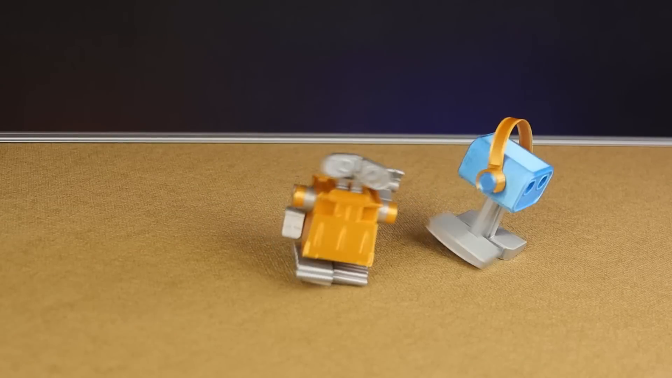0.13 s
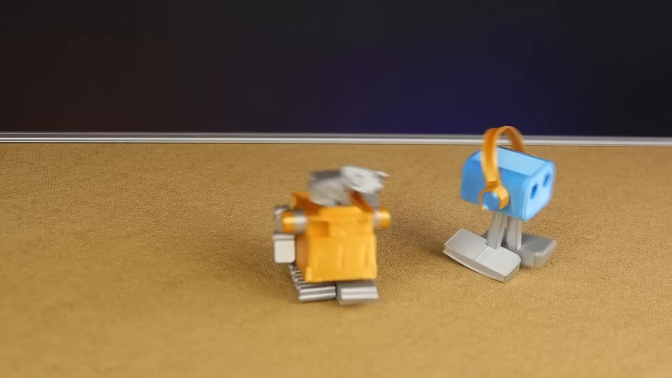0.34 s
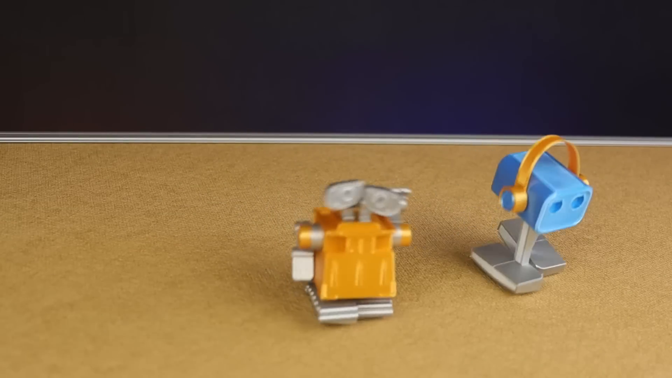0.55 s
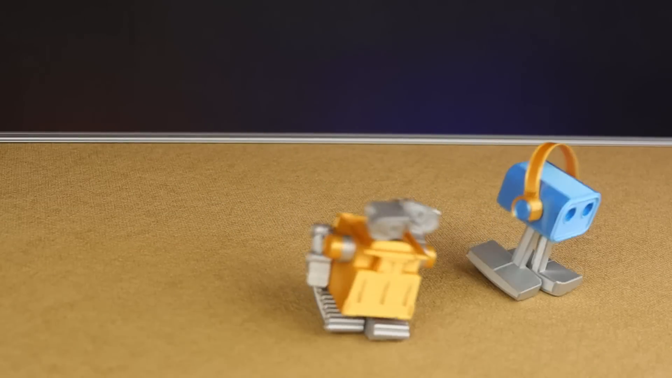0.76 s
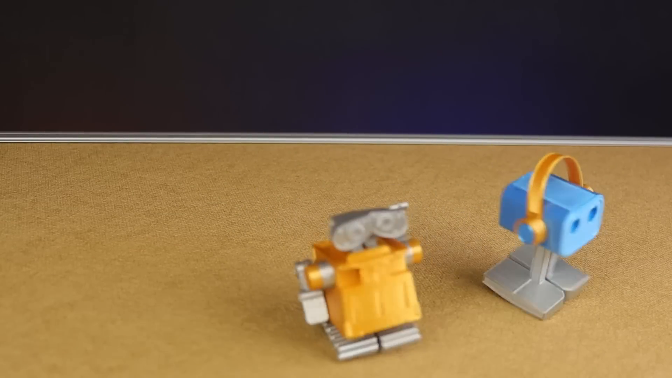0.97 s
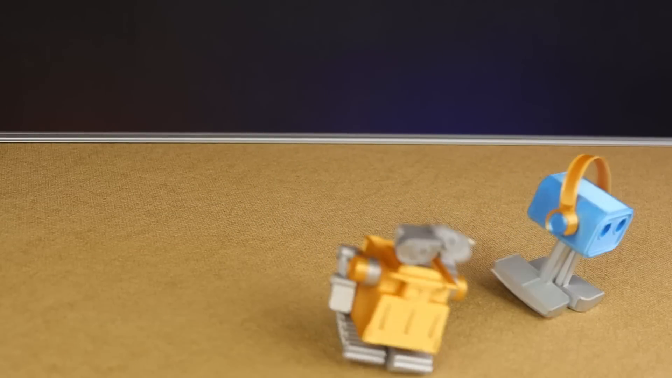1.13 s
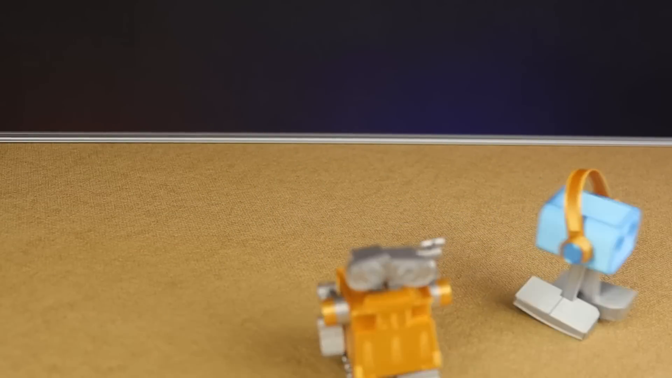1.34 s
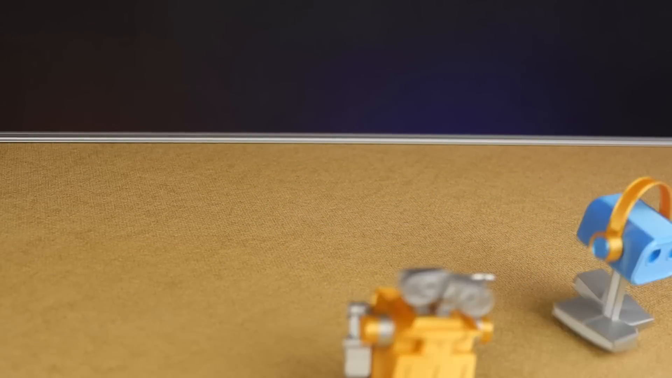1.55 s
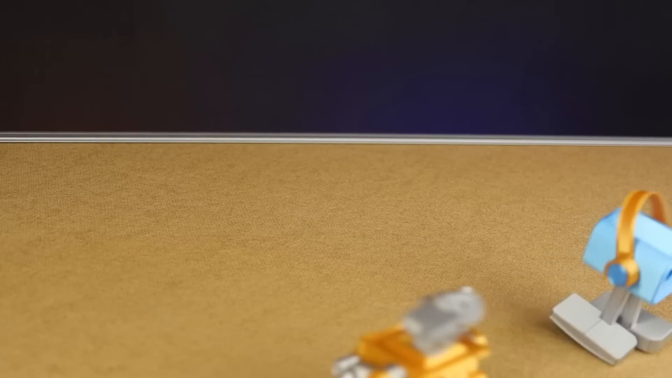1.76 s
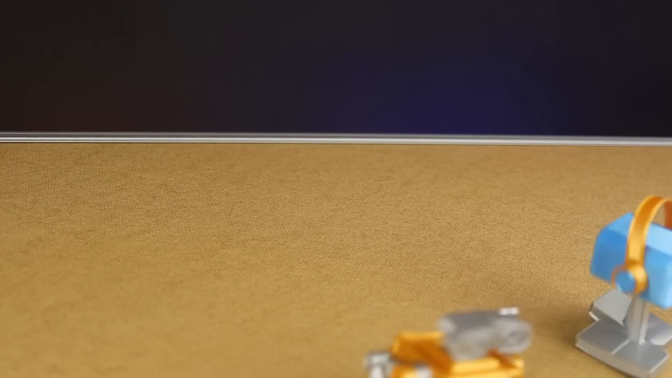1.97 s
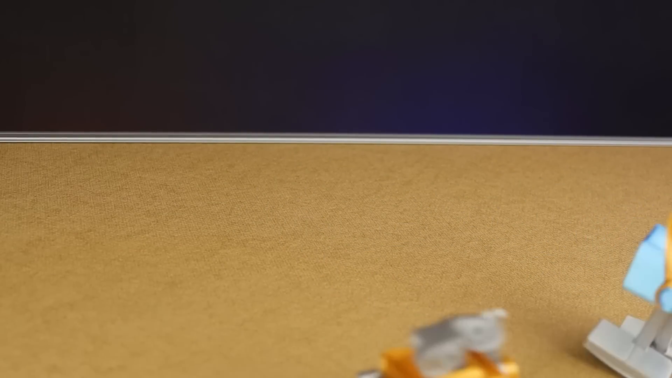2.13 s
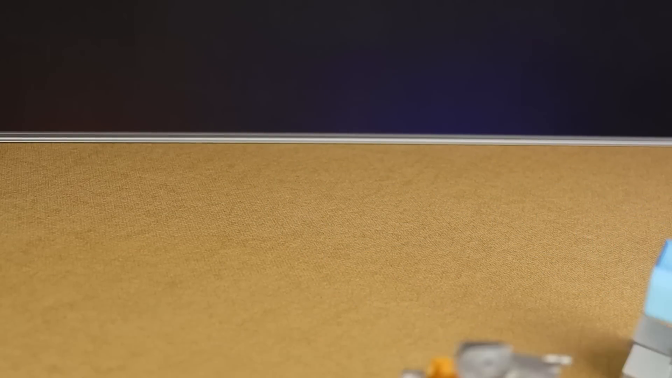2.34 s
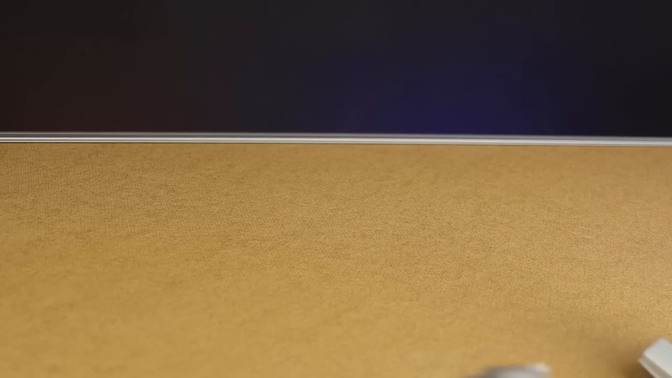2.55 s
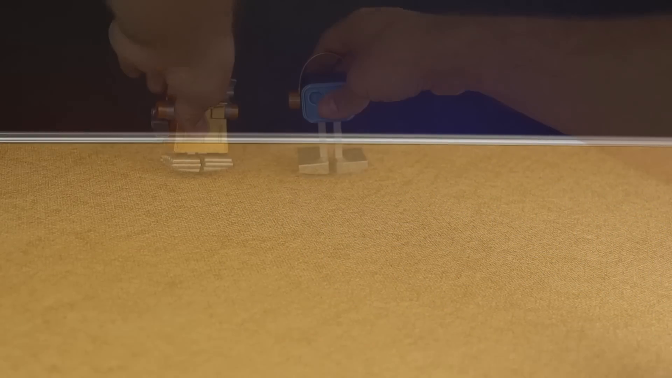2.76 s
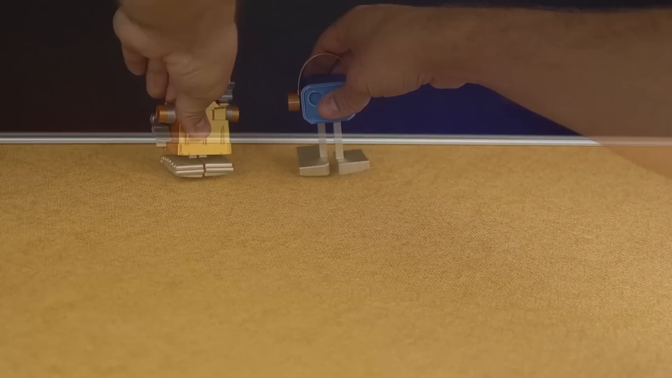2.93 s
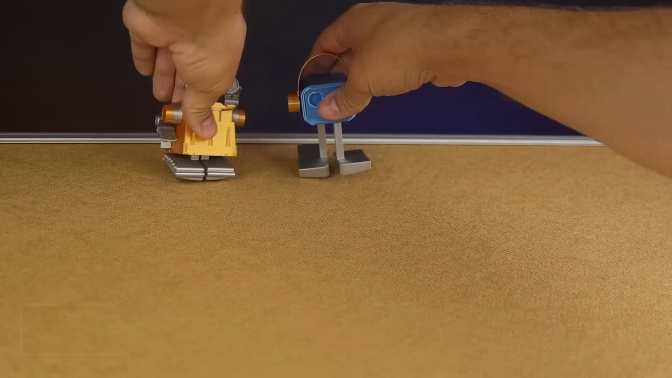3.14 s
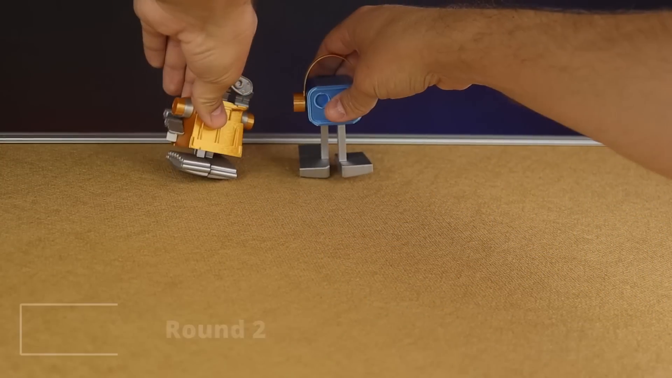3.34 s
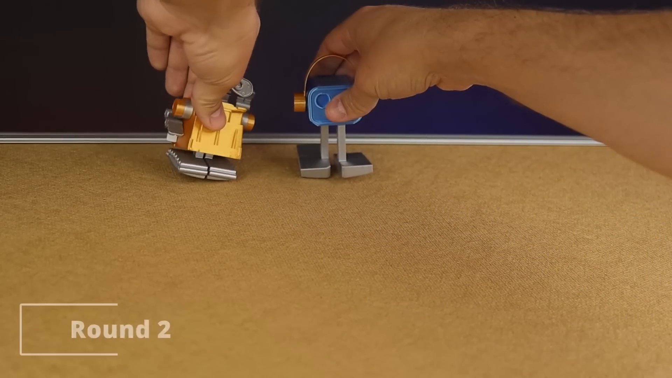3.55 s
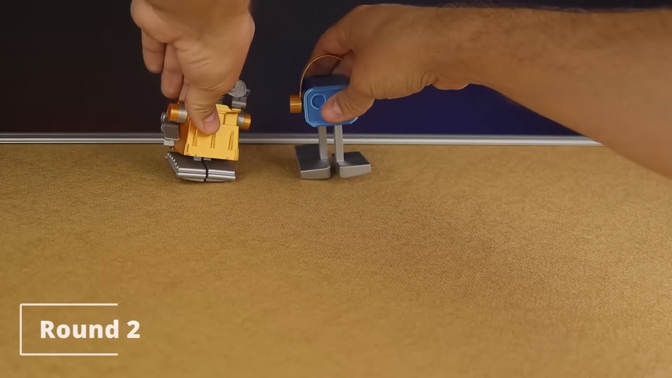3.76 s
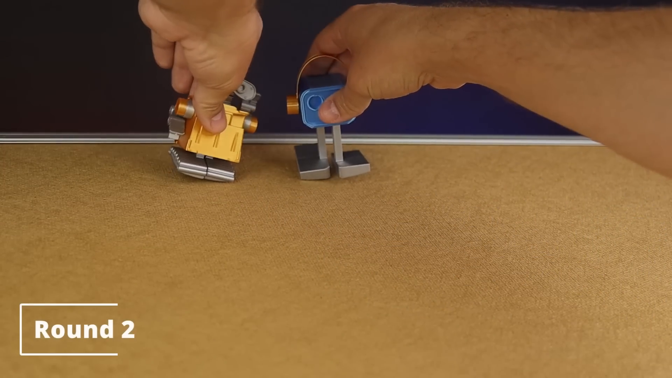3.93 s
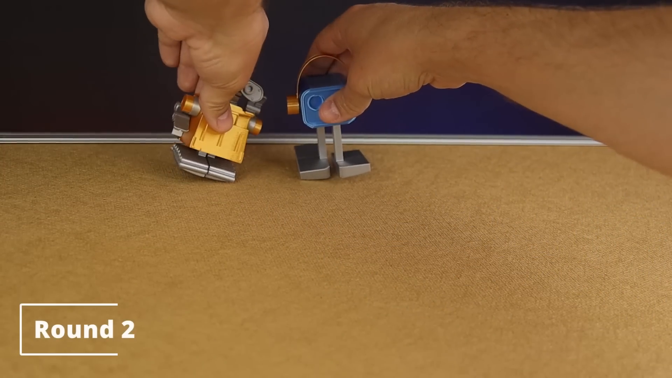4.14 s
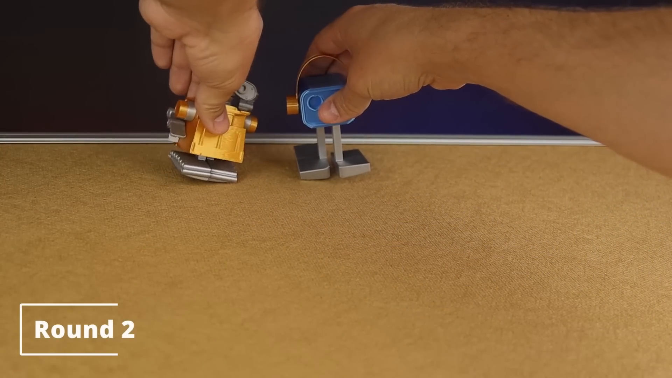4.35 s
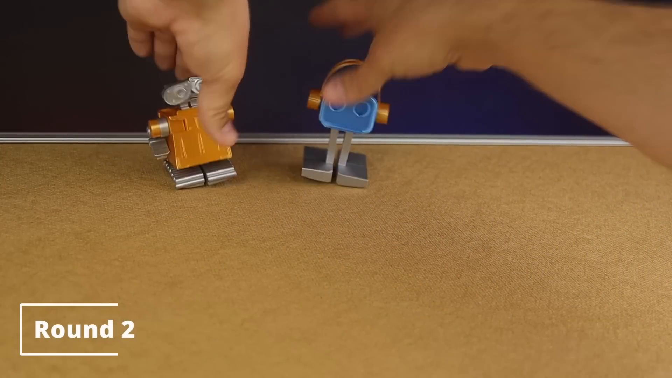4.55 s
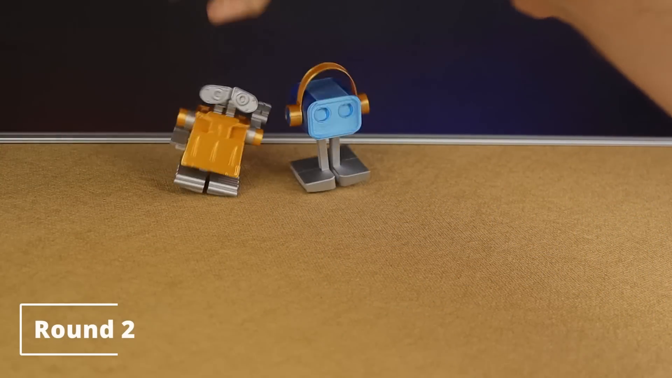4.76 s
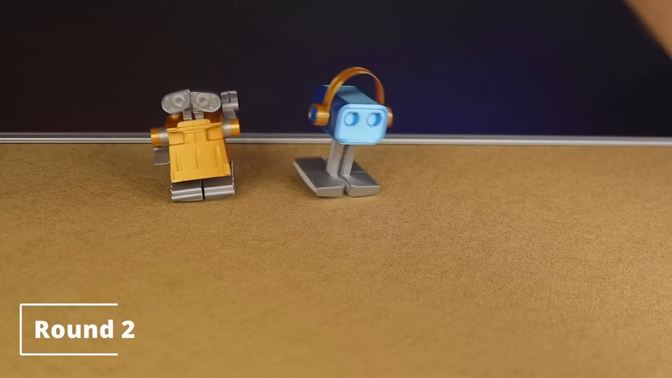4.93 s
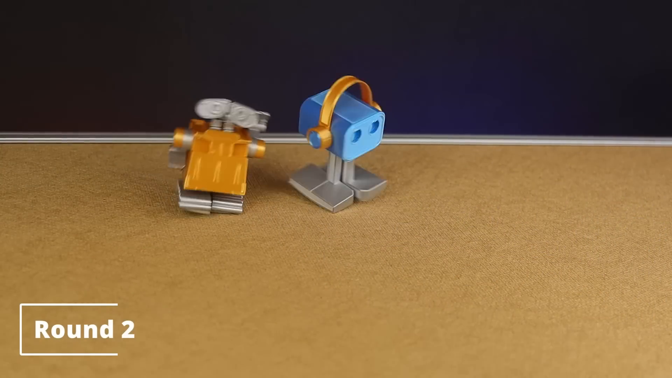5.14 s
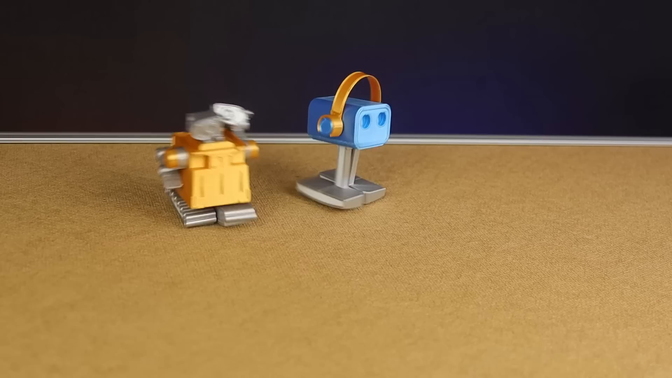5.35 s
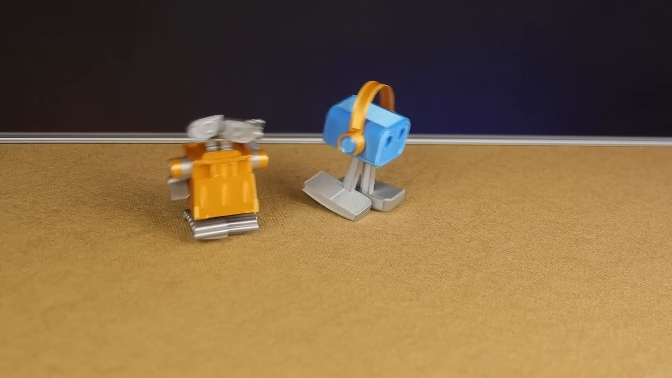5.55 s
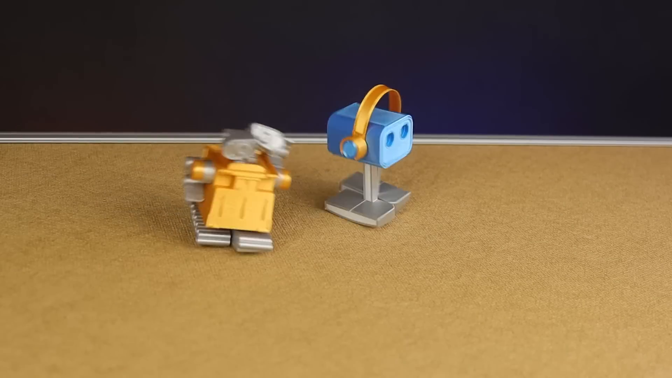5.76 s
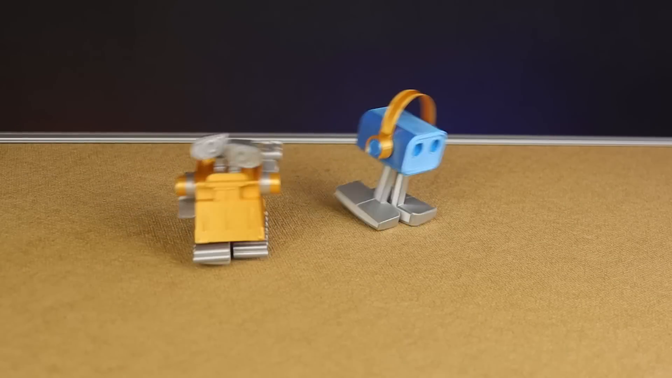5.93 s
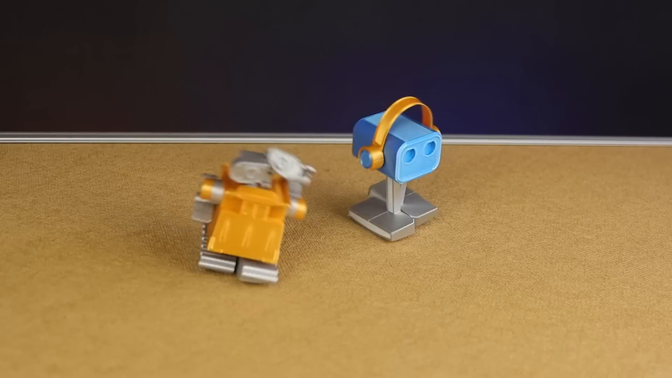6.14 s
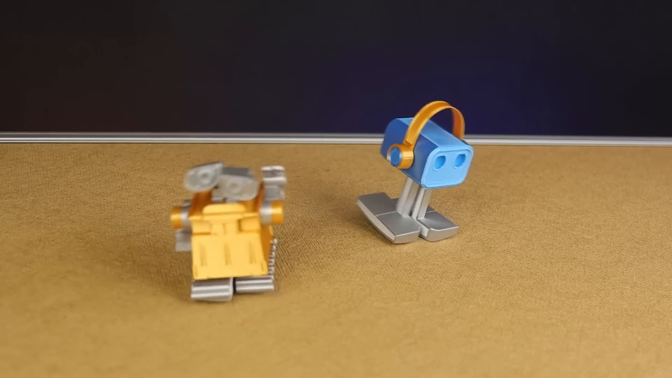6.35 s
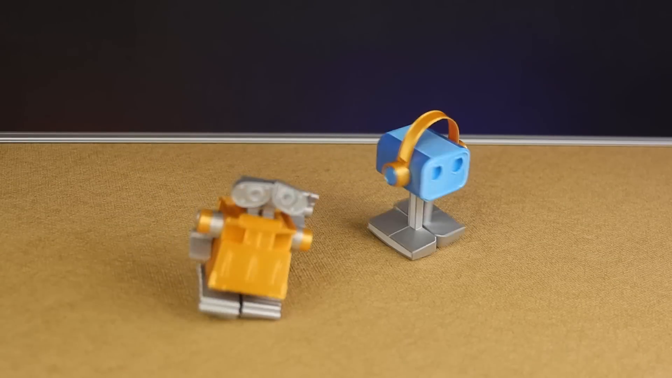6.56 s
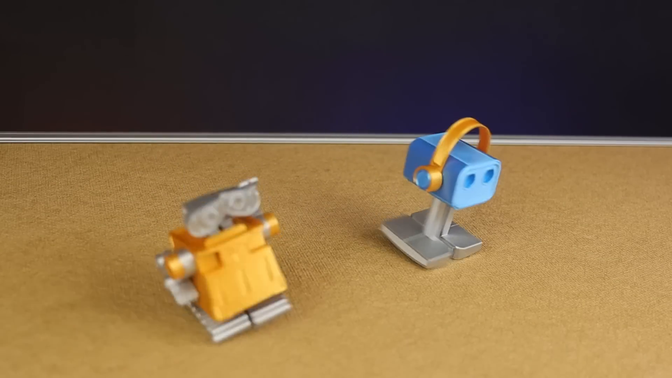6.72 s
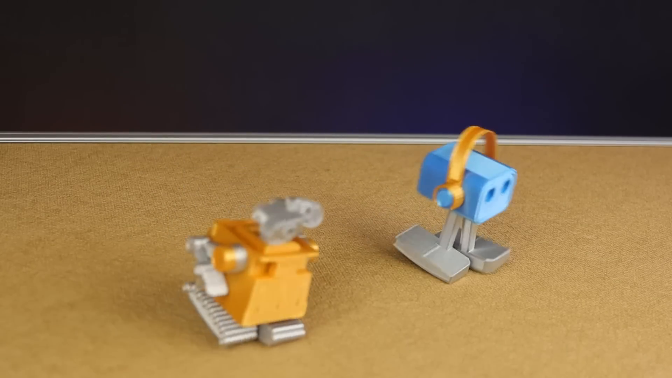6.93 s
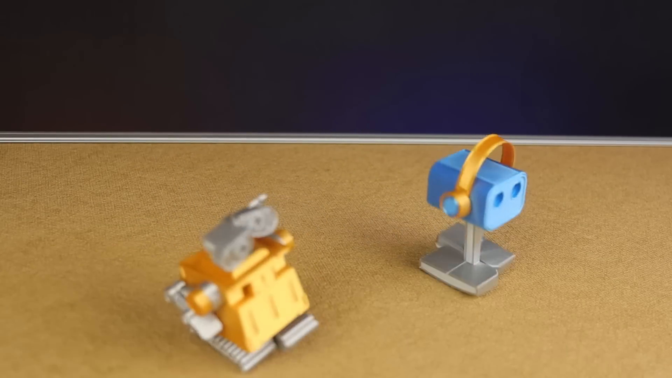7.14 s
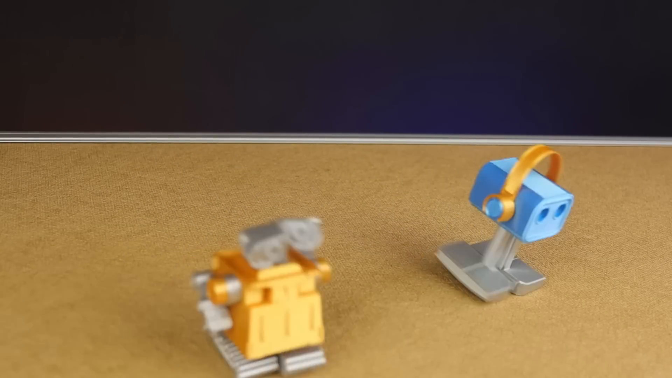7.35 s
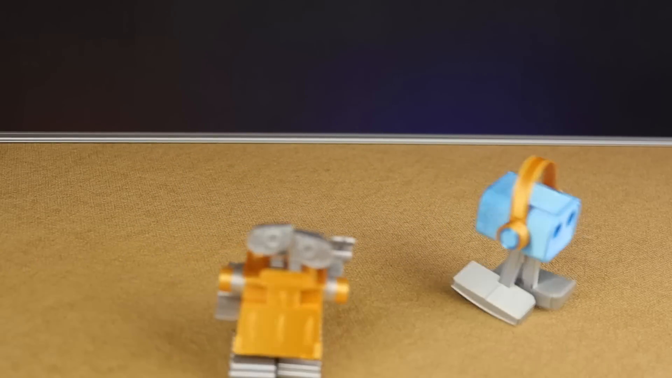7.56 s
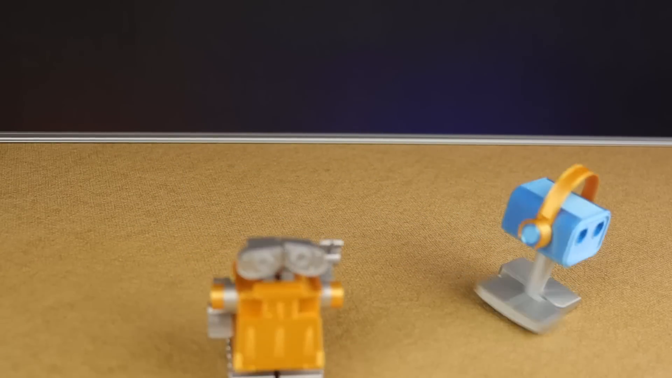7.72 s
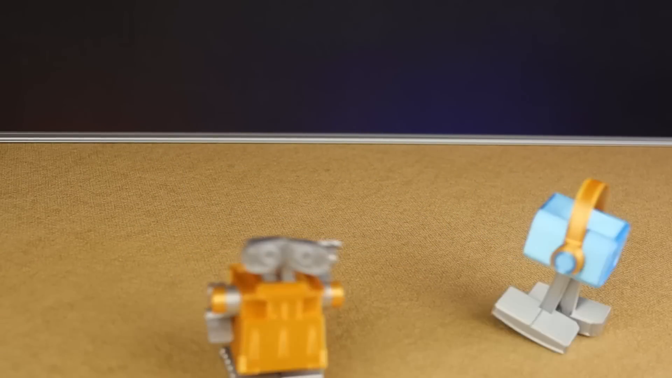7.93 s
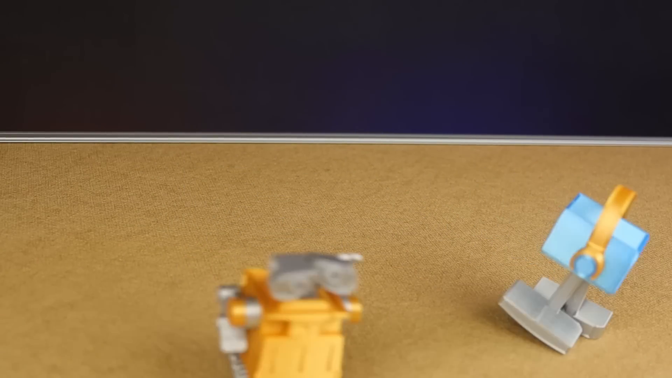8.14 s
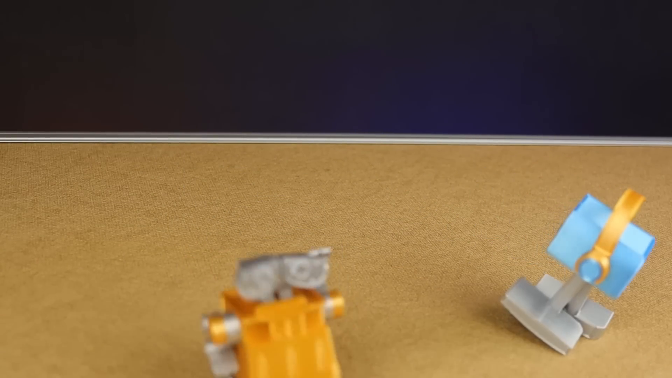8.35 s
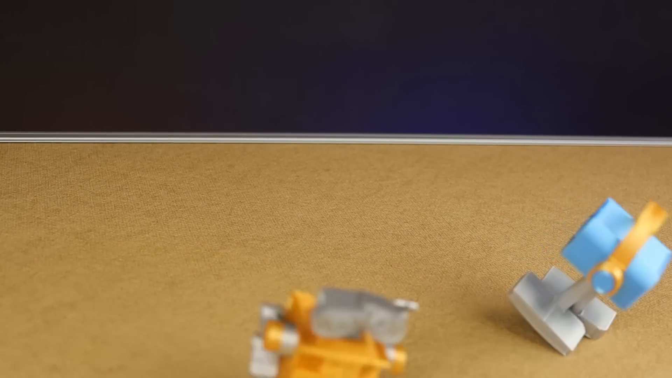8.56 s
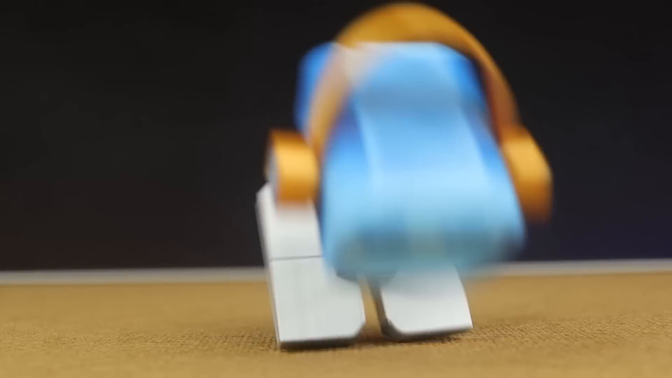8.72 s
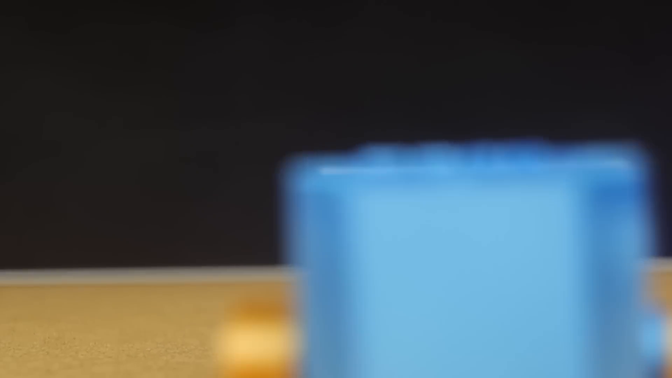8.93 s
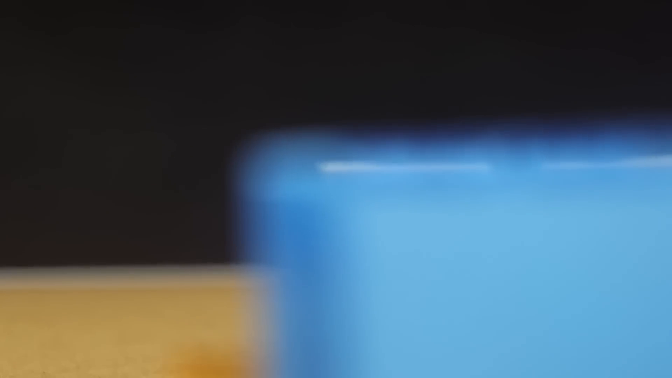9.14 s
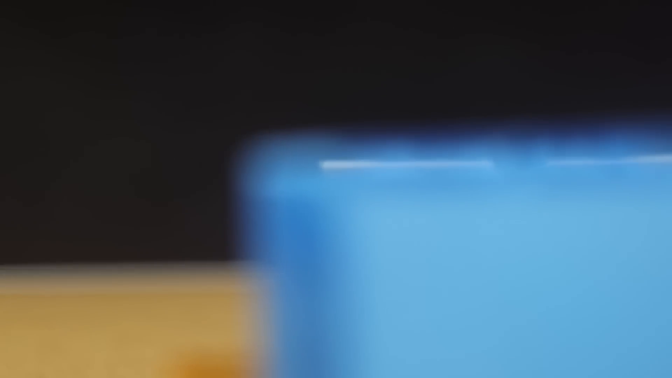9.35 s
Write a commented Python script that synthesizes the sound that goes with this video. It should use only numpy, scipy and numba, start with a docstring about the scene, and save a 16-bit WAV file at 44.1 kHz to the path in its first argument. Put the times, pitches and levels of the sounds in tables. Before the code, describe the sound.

From 0 to about 2.95 seconds, two small plastic walking toys shuffle over a thin, hollow-sounding tabletop: quick irregular foot thumps, crisp dry plastic clicks, dense loose rattling, gritty gear whirr and a wobbling low motor hum. A brief lull comes near 2 seconds, then a very faint thin treble whine. The sound cuts off abruptly. From 3 to 4.5 seconds there is only soft room noise, a low drone swelling around 3.9, and faint rustles and tiny ticks of fingers on plastic. At 4.5 the second walk starts abruptly, busier and a little heavier, with a strong thump near 7.6 and thinner patter around 8.2. At 8.87 one toy topples: a loud hard knock on the board, rapid small bounces and rattling, fading with small clicks until about 9.45. Close stereo perspective, short dull room tail.

```python
"""Two small plastic robots shuffle over a thin table top in two walks with a gap between, and one topples.
Feet thump the board and plastic clicks: fading sines at the modes of board and shell, begun by rough contacts.
Loose parts rattle as dense chance knocks, gears whirr as gritty noise, motors hum as wobbling sines.
Fingers tick on the shells and a thin whine flickers (bands of noise) over steady room noise and a low drone."""
import sys
import numpy as np
from scipy import signal
from scipy.fft import rfft, irfft
from scipy.io import wavfile
from scipy.ndimage import uniform_filter1d
from numba import njit

SR = 44100
rng = np.random.default_rng(int(sys.argv[2]) if len(sys.argv) > 2 else 0)


def to_wav(s):
    """Save 16-bit WAV."""
    ch = np.atleast_2d(s).T  # columns
    pcm = np.round(np.clip(ch, -1, 1) * 32767)  # PCM
    wavfile.write(sys.argv[1], SR, pcm.astype(np.int16))


N = 418509

# ringing modes of the table top: (frequency [Hz], level [dB], t60 [s])
BOARD_MODES = [(46.7, -18, 0.37), (91.2, -14, 0.56), (152.2, -4, 0.11), (212.5, -12, 0.21), (275, 1, 0.12),
               (335, 0.5, 0.12), (403.9, -0.5, 0.12), (461.3, -11.5, 0.15), (554.5, -6, 0.15),
               (626, -3.5, 0.077), (791.5, -1.5, 0.058), (936.7, -3.5, 0.055), (1120, -12.5, 0.075),
               (1368, -15.5, 0.053), (1674, -11.5, 0.03), (2000, -17, 0.022)]
# ringing modes of the plastic shells: (frequency [Hz], level [dB], t60 [s])
SHELL_MODES = [(1215, 4, 0.013), (1633, -0.5, 0.018), (2090, 3, 0.021), (2524, -3, 0.019),
               (2897, -4, 0.021), (3234, -11.5, 0.049), (3800, 1, 0.0097), (4320, 2.5, 0.012),
               (4710, -8.5, 0.023), (5184, 0.5, 0.016), (6095, -10, 0.029), (6500, -23, 0.0022),
               (7290, 1, 0.014), (7740, 0, 0.0059), (8650, -6, 0.018), (9550, -6.5, 0.023),
               (10500, -27, 0.0044), (11170, -8, 0.018), (11400, -16.5, 0.0061), (12770, -3.5, 0.0065),
               (13800, -30, 0.0071), (15200, -15, .005)]
# plastic on plastic, one list per walk, then further clicks from both walks and after the fall: (time [s],
# level [dB], body [dB], legs [dB], thin parts [dB], sharp top [dB])
CLICK_EVENTS = [
    [(0.1281, -33.5, -4, -4, -7, -6), (0.2558, -29.5, -23, -15, 1.5, -17), (0.2843, -20, -18, -25, -9, -27),
     (0.3815, -40.5, 2, -5, -16, -14), (0.415, -26.5, -7, -13, -19, -19), (0.5402, -32, -12, 3, 4, -24),
     (0.5975, -22, -18, -27, -16, -17), (0.626, -23, -9, -12.5, 1.5, -10), (0.7038, -25, -9, -9, 0, 3),
     (0.7946, -26.5, -12, -10, -13, -12), (0.8789, -32.5, -12, -1.5, -2, -23),
     (0.9088, -37, -14, -17, 2, -19), (0.9702, -28, -14, -19, -1.5, -17), (1.0784, -28.5, -12, -6, -7, -27),
     (1.2805, -17, -35, -28, -29, -37), (1.4192, -41.5, -3, 2.5, -21, -23), (1.487, -30.5, -4, -6, -24, -5),
     (1.5294, -25.5, -18, -22, 0, -14), (1.6043, -29.5, -11, -13, -9, -25),
     (1.6656, -29.5, -1.5, -4.5, 5, -2), (1.729, -24.5, -26, -19, -10, -8),
     (1.7938, -23.5, -19, -8.5, -18, -17), (1.8277, -24.5, -12.5, -25, -21, -20),
     (2.0098, -32, -23, -30, -15, -25), (2.1854, -35.5, -2, -4, -1, -24), (2.378, -34, -16, -6, -18, -29),
     (2.4034, -26.5, -10.5, -7, -11, -10), (2.4648, -35, -4.5, -8, -17, -26),
     (2.5247, -33, -10.5, -18, -17, -22), (2.5721, -35, -16, -4, -8, -17),
     (2.611, -27, -10.5, -7.5, -23, -23), (2.7556, -26, -9.5, -10, -11, -19),
     (2.7906, -26, -15, -6, -7, -8), (2.8439, -36.5, -5, -3, -21, -22), (2.8898, -28, -8.5, -9, -3, -21),
     (2.9038, -31.5, -23, -24, 4, -20)],
    [(4.6017, -29, -21, -14, -10, -26), (4.7239, -29.5, -6.5, -12, 6.5, -24),
     (4.8007, -29.5, -18, -3.5, -19, -22), (4.9489, -32.5, -10, -2, -5, -5), (4.9983, -34, -23, -6, 0, -22),
     (5.0626, -30, -3, -3.5, -20, -15), (5.1031, -28, 0, -4, -3, -4), (5.1544, -30, -19, -1, -5, -27),
     (5.2597, -26, -5.5, -11, -6, -10), (5.3824, -24, -27, -14, -6, -26), (5.4528, -33.5, -2, -8, -1, -9),
     (5.4877, -32, -10, -0.5, 2, -3), (5.5386, -32, -22, -5, -16, -8), (5.6124, -29.5, -19, -3, -19, -16),
     (5.6249, -17, -26, -25, -14, -20), (5.6947, -43, -21, 7, -23, -26), (5.8389, -19, -23, -28, -22, -29),
     (5.9416, -24.5, -17, -13, -13, -23), (5.9895, -31, -22, -6, 4, -7),
     (6.1322, -25.5, -8.5, -9, -27, -18), (6.1821, -31.5, -11, -11, 1, -2), (6.2275, -33, -5, -16, -16, -5),
     (6.242, -31.5, -21, 2.5, 0, -25), (6.3078, -16.5, -28, -21, -20, -20),
     (6.3542, -23.5, -11, -22, -25, -10), (6.5114, -30, -8, -10, -27, -29),
     (6.5503, -19.5, -13, -16.5, -30, -29), (6.6151, -32, -13, 0.5, -14, 0),
     (6.7343, -25.5, -9.5, -12, -23, -7), (6.8346, -25, -20, -11, -16, -18),
     (6.8521, -28, -8, -28, -25, -21), (6.907, -25, -8, -13, -19, -6), (6.9778, -29, -5.5, -21, 0.5, -20),
     (7.0471, -34.5, -24, -0.5, -5, -12), (7.1035, -26, -32, -13, -27, -24), (7.1793, -37, -24, 4, 7, -22),
     (7.2167, -27.5, -7, -5, 5.5, 1), (7.3405, -21, -15, -11, -16, -16),
     (7.3629, -25.5, -15, -3.5, -26.5, -22), (7.4308, -29.5, -10, -8.5, -7, -12),
     (7.5126, -28, -8.5, -13, -14, -19), (7.535, -30, -2.5, -8, -2, -8),
     (7.5709, -16.5, -23, -13, -6, -0.5), (7.6094, -25, -8, -29, 1, -10),
     (7.8693, -20.5, -11.5, -19, -5, -8), (7.9386, -22, -26, -28, 0, -15),
     (8.2853, -32.5, -8, -6, -5, -5.5), (8.3572, -32.5, -21, -9, -8, -14), (8.4115, -39, -25, -5, 0, -26),
     (8.5457, -31, -5, -12, -30, -30), (8.629, -27.5, -15, -3, -3, -13),
     (8.6869, -16.5, -42, -34, -22, -32), (8.7328, -24.5, -14, -14, -1.5, -5)],
    [(0.0583, -35, -21, -22, -5, -11.5), (0.1555, -37, -16, -1, -16, -27), (0.4589, -37, -22, -20, 3, 0),
     (0.695, -34, -25, -22, -2, -22), (0.7397, -29, -12, -10, -10, -18), (1.3738, -34, -2, -8, -15, -24),
     (1.6247, -25, -16, -15, -10, -25), (2.3261, -33, -29, -20, -19, -10), (2.8135, -36, -19, -15, 3, -18),
     (4.6678, -28, -11, -18, -15, -22), (4.8439, -24.5, -15, -13, -16, -24),
     (4.9053, -28.5, -9, -13, -6.5, -18), (5.1876, -32, -6, -9, -13, -23), (5.2739, -39, -5, 3.5, -7, -21),
     (5.3308, -37, -8, -2, -11, -21), (5.3996, -23.5, -8, -13, -27, -17), (5.6444, -27.5, -22, -4, 4, -16),
     (5.7423, -29, -11, -12, -27, -21), (5.917, -47, -7, -7, -10, -18), (6.0621, -34, -13, -14, -24, -17),
     (6.153, -31.5, -3, -25, -25, -25), (6.2781, -32, -23, -13, -6, -16), (6.4637, -28, -22, -17, -9, -18),
     (6.6822, -34, -6, -22, -1, -21), (6.9421, -45, -8, -12, -9, -16), (7.0105, -28, -11, -11, -12, -14),
     (7.5504, -29, -16, -6, -13, -21), (7.5864, -34, -21, -16, -13, -19),
     (7.658, -28.5, -7.5, -13, -19, -4), (7.7268, -41, -28, -22, 6, -22), (7.8466, -30, -15, -20, -16, -25),
     (7.9064, -33, -6, -11, -6, -11), (8.0012, -25, -11.5, -24, -22, -20), (8.0716, -35, -27, -22, -6, -7),
     (8.1653, -40.5, -15, -2, -8, -3), (2.428, -36, -25, -22, 2, -22), (8.4756, -40, -5, -7, -22, -24),
     (8.516, -37, -18, -17, -11, -5), (9.2325, -47, -25, -6, -25, -25), (9.254, -44, -25, -1, -18, -25),
     (9.279, -33.5, -12, -21, -21, -25), (9.341, -37, -8, -7.5, -23, -9), (9.449, -34, -22, 1, 3, 0)],
]
# the toy topples, bounces and rocks to rest: (time [s], board level [dB], bright part [dB], shell level [dB])
FALL_BLOWS = [(8.869, 1, -17, -25), (8.873, -1.5, -4.5, -11.5), (8.878, -4, -4, -30),
              (8.891, -19, -14, -15), (8.904, -18, 3, -38), (8.917, -19, -9, -27), (8.927, -14, -22, -22.5),
              (8.936, -10, -19, -31), (8.957, -12, -20, -27), (8.974, -14, -7, -28.5),
              (8.998, -13.5, -15, -44), (9.014, -38, -10, -26.5), (9.024, -23, -27, -28.5),
              (9.046, -19, -15, -40), (9.067, -16, -14, -27.5), (9.099, -17.5, -16, -53),
              (9.125, -17.5, -19, -45), (9.144, -14.5, -20, -42), (9.165, -23, -15, -39.5),
              (9.279, -24, -3.5, -60), (9.341, -20.5, -11.5, -60), (9.441, -29, 0.5, -61),
              (9.45, -25, -14, -60)]


def undb(db):
    """Decibels to amplitude; twice the decibels give power."""
    return 10 ** (np.asarray(db) / 20)


def unit(x):
    """Scales a signal to an RMS of one."""
    return x / np.sqrt(np.mean(x ** 2))


def band(x, hz, width):
    """A resonance at hz, width hertz wide."""
    return signal.lfilter(*signal.iirpeak(hz, hz / width, SR), x)


def curve(walks, column):
    """One column of both walks, joined by straight lines in time."""
    rows = np.vstack(walks)
    return np.interp(np.arange(N) / SR, rows[:, 0], rows[:, column], right=rows[-1, column])


def slow_noise(window):
    """Noise smoothed over a window of samples, at unit RMS, for slow random changes."""
    return unit(uniform_filter1d(rng.standard_normal(N), window))


def shell_parts():
    """Which part of the shell each mode belongs to: body, legs, thin parts, top."""
    return np.digitize(np.array(SHELL_MODES)[:, 0], [3300, 6100, 8200])


@njit
def decay(start, hz, t60, gain, phase, rise_s, length):
    """Sums fading sines that swell over rise_s; gain has a row for each channel."""
    out = np.zeros((2, length))
    rise = np.exp(-1 / (rise_s * SR))
    for k in range(len(start)):
        if gain[0, k] == 0:
            continue
        p = np.exp(2j * np.pi * hz[k] / SR - np.log(1000.) / (t60[k] * SR))
        z, wait = np.exp(1j * phase[k]), 1.
        # each sine stops after 36 dB of fading
        for i in range(start[k], min(length, start[k] + int(.6 * t60[k] * SR))):
            z *= p
            wait *= rise
            out[0, i] += gain[0, k] * z.imag * (1 - wait)
            out[1, i] += gain[1, k] * z.imag * (1 - wait)
    return out


def ring(s, db, modes, contact_s, rise_s, detune, spread_db, pan_db=0., pitch_hz=0.):
    """A rough contact starts the modes one after another; pose and grip shift them a little at every blow."""
    hz, mode_db, t60 = np.transpose(modes)
    lean, shift = rng.standard_normal((2, *db.shape))
    late, phase = rng.random((2, *db.shape))
    start = ((s - contact_s * np.log(1 - late) * late) * SR).astype(np.int64)
    # the channels differ very slightly more the shorter the wave
    lean = spread_db * (hz / 3000) ** 0.018 * lean + pan_db / 2
    gain = undb(np.reshape([db + mode_db + lean, db + mode_db - lean], (2, -1)))
    pitch = hz * (1 + detune * shift)
    # the weight on the spot pulls the nearest mode to its own pitch
    gap = np.abs(hz - pitch_hz)
    nearest = gap == np.min(gap, axis=-1, keepdims=True)
    pitch = np.where(nearest & (pitch_hz > 0), pitch_hz, pitch)
    pitch = np.minimum(pitch, .4 * SR).ravel()
    return decay(start.ravel(), pitch, (t60 + 0 * db).ravel(), gain, 2 * np.pi * phase.ravel(), rise_s, N)


def room(x):
    """A short dull tail of fading noise; the channels share its bass and differ in its treble."""
    t60_s = 0.16
    t = np.arange(int(.4 * SR)) / SR
    mid, side = rng.standard_normal((2, len(t))) * np.exp(-np.log(1000) * t / t60_s) * (t > .003)
    side = signal.lfilter(*signal.butter(1, 1500, "high", fs=SR), side)
    tail = signal.lfilter([1], [1, -.3], [mid + side, mid - side])
    tail = tail / np.sqrt(np.sum(tail ** 2, axis=1, keepdims=True))
    return signal.oaconvolve(x, tail, axes=1)[:, :N]


def air():
    """Steady room noise, alike in both channels in the bass, lifted by rubbing hands, with a swelling drone."""
    # colour of the room noise: (frequency [Hz], level [dB])
    spectrum = [(15, -61), (25, -13), (80, -0.5), (108, 3.5), (167, -11), (245, -7.5), (358, -9.5),
                (410, -17), (470, -12), (687, -18), (809, -23.5), (1500, -26), (2200, -29), (3000, -36.5),
                (4240, -41.5), (14800, -46.5), (16500, -56)]
    spectrum_hz, spectrum_db = np.transpose(spectrum)
    noise_db = -47.5
    rub_middle_s, rub_spread_s, rub_lift_db = 3.35, 0.31, 2.8
    drone_peak_s, drone_db, drone_slope_db_per_s = 3.88, -42, 52
    t = np.arange(N) / SR
    f = np.fft.rfftfreq(N, 1 / SR) + 1
    colour = undb(np.interp(np.log(f), np.log(spectrum_hz), spectrum_db))
    mid = irfft(rfft(rng.standard_normal(N)) * colour, N)
    side = irfft(rfft(rng.standard_normal(N)) * colour * np.clip(f / 900, .05, .9), N)
    noise = unit(mid + side * np.array([[1], [-1]]))
    rub_db = rub_lift_db * np.exp(-((t - rub_middle_s) / rub_spread_s) ** 2)
    drone = unit(band(band(rng.standard_normal(N), 102.0, 14), 109, 12))
    drone_level = undb(drone_db - drone_slope_db_per_s * np.abs(t - drone_peak_s))
    return noise * undb(noise_db + rub_db) + drone * drone_level


def ticks():
    """Skin creeps over plastic: a thin snap and a fading rustle around one pitch, over a faint crackle."""
    # fingers shifting on the held shells: (time [s], level [dB], centre [Hz])
    finger_moves = [(3.019, -47, 9600), (3.078, -46, 9170), (3.158, -32, 990), (3.159, -41, 4800),
                    (3.215, -27, 516), (3.279, -42, 4660), (3.285, -35, 1310), (3.312, -46, 5200),
                    (3.319, -38, 9600), (3.443, -46, 8900), (3.445, -25, 600), (3.446, -52, 5200),
                    (3.789, -47, 9230), (3.811, -46, 9140), (3.878, -47, 11400), (3.885, -36, 1300),
                    (3.95, -47, 10500), (4.257, -44, 7280), (4.43, -43, 9600), (4.508, -42, 9160),
                    (4.544, -37, 9550)]
    creep_per_s, creep_base_db, rustle_s, snap_s = 29, -65, 0.02, 0.0019
    hits = (rng.random(N) < creep_per_s / SR) * undb(creep_base_db + 4.0 * rng.exponential(size=N))
    creep = signal.lfilter([1], [1, -np.exp(-1 / (.002 * SR))], hits)
    out = band(creep * rng.standard_normal((2, N)), 10000, 6000)
    t = np.arange(int(.08 * SR)) / SR
    for s, level_db, hz in finger_moves:
        # partly shared by the channels
        noise = rng.standard_normal(len(t)) + 0.64 * rng.standard_normal((2, len(t)))
        rustle = unit(band(band(noise, hz, 0.5 * hz), hz, 0.51 * hz)) * np.exp(-t / rustle_s)
        out[:, int(s * SR):][:, :len(t)] += undb(level_db - 21.5) * rustle
        if hz > 3000:  # only high ticks snap
            snap = unit(band(noise, hz, 0.9 * hz)) * np.exp(-t / snap_s)
            out[:, int(s * SR):][:, :len(t)] += undb(level_db - 17.5) * snap
    return out


def whine():
    """A thin whirr in the treble: a narrow flickering band of noise."""
    # when it sounds: (start [s], end [s], level [dB])
    spans = [(2.03, 2.95, -62.5), (9.05, 9.357, -66)]
    hz, width_hz = 8900, 670
    t = np.arange(N) / SR
    on = sum(undb(db) * np.clip(np.minimum(t - start, end - t) / .03, 0, 1) for start, end, db in spans)
    flicker = undb(3.0 * slow_noise(int(.02 * SR)))
    noise = band(band(rng.standard_normal((2, N)), hz, width_hz), hz, width_hz)
    return on * unit(flicker * noise)


def hum():
    """The unbalanced motor shafts shake the board once a turn, with a wobble in speed and grip."""
    # the hum swells and shifts in pitch, one list per walk: (start [s], length [s], level [dB], pitch [Hz])
    hum_swells = [
        [(0.122, 0.062, -34.5, 68.5), (0.249, 0.034, -34, 74.7), (0.649, 0.11, -39, 64.1),
         (0.818, 0.21, -35.5, 64), (1.106, 0.061, -36, 65.6), (1.275, 0.058, -32.5, 66.2),
         (1.381, 0.056, -33, 66.7), (1.527, 0.34, -32.5, 67), (1.966, 0.043, -37, 67.5),
         (2.111, 0.078, -37, 64.5), (2.433, 0.047, -44, 66.3), (2.604, 0.14, -37.5, 67.7),
         (2.814, 0.11, -33, 65)],
        [(4.883, 0.14, -40, 63.3), (5.134, 0.088, -33.5, 68.3), (5.284, 0.24, -34.5, 65.6),
         (5.653, 0.33, -37, 65), (6.252, 0.27, -32.5, 65.9), (6.595, 0.2, -34, 65.2),
         (6.856, 0.16, -31.5, 64.5), (7.13, 0.12, -32, 69.2), (7.363, 0.11, -34, 67.9), (7.59, 0.17, -40, 66.3),
         (8.169, 0.076, -37, 67.2), (8.329, 0.062, -33.5, 66.7), (8.604, 0.079, -36, 68),
         (8.774, 0.056, -36, 64.0), (8.886, 0.36, -35, 70.3), (9.275, 0.056, -36, 61),
         (9.383, 0.052, -37.5, 65.6)],
    ]
    between_db, glide_s = -45, .05
    t = np.arange(N) / SR
    start, length, db, hz = np.vstack(hum_swells).T
    power = undb(2 * between_db)
    for s, w, d in zip(start, length, db):
        power = power + undb(2 * d) * np.exp(-((t - s - w / 2) / (0.49 * w)) ** 4)
    pitch = uniform_filter1d(np.interp(t, start + length / 2, hz), int(glide_s * SR))
    speed = 1 + 0.028 * slow_noise(int(0.025 * SR))
    turn = 2 * np.pi * np.cumsum(pitch * speed) / SR
    grip = undb(2.1 * slow_noise(int(.08 * SR)))
    return np.sqrt(2 * power) * grip * np.sin(turn)


def whirr(level_db):
    """Gears and sliding feet rub without pause: gritty noise in every other shell mode, widened."""
    grit = rng.standard_normal((2, N)) * undb(6.9 * slow_noise(130))
    grit[1] = 0.21 * grit[0] + 0.83 * grit[1]
    rub = sum(undb(db) * band(grit, hz, 0.14 * hz) for hz, db, _ in SHELL_MODES[::2])
    return unit(rub) * undb(level_db)


def shake(s, level_db, under_db, rise_s, t60):
    """Power of the shaking after each blow: a quick rise, then an even fade."""
    power = np.bincount((np.asarray(s) * SR).astype(int), undb(2 * (level_db + under_db)), N)
    rise, fade = np.exp(-1 / (rise_s * SR)), np.exp(-2 * np.log(1000) / (t60 * SR))
    return signal.lfilter([1 - rise], np.convolve([1, -rise], [1, -fade]), power)


def strain(column):
    """Power of the rattle as a foot drags over the board and the gears strain: rise, hold, fade."""
    # one list per walk: (start [s], length [s], board level [dB], shell level [dB])
    drags = [
        [(0.011, 0.018, -25.5, -40), (0.141, 0.029, -43, -53), (0.205, 0.051, -45, -40),
         (0.302, 0.04, -27, -38.5), (0.404, 0.041, -38, -46.5), (0.526, 0.01, -34, -37.5),
         (0.586, 0.24, -32.5, -64), (0.799, 0.044, -33, -44), (0.863, 0.033, -28.5, -47),
         (0.923, 0.1, -28.5, -42), (1.075, 0.19, -34.5, -47), (1.276, 0.29, -27, -43.5),
         (1.615, 0.28, -28, -48.5), (1.787, 0.15, -32, -51), (2.046, 0.11, -29.5, -41.5),
         (2.164, 0.047, -29.5, -44), (2.376, 0.067, -27, -58), (2.539, 0.067, -32, -61),
         (2.607, 0.078, -25, -42.5), (2.751, 0.17, -27.5, -46)],
        [(4.553, 0.015, -35, -67), (4.646, 0.035, -39, -53), (4.716, 0.015, -23.5, -38), (4.83, 0.15, -25, -46),
         (5.054, 0.084, -27, -62), (5.167, 0.12, -23, -45), (5.315, 0.03, -32.5, -61), (5.365, 0.1, -25.5, -61),
         (5.586, 0.21, -28.5, -48), (5.826, 0.19, -25, -40), (6.059, 0.028, -28, -46), (6.111, 0.3, -27, -46),
         (6.452, 0.03, -25, -45), (6.506, 0.17, -27, -46), (6.726, 0.077, -32, -40), (6.823, 0.13, -29, -43.5),
         (7.005, 0.063, -33, -57), (7.099, 0.15, -23.5, -42), (7.282, 0.11, -25, -46), (7.514, 0.18, -31, -61),
         (7.883, 0.21, -29, -51.5), (8.121, 0.054, -33.5, -61), (8.366, 0.039, -26, -64),
         (8.472, 0.04, -30, -63), (8.585, 0.11, -30, -48), (8.677, 0.11, -24.5, -60)],
    ]
    rise_s, t60_s = 0.014, 0.047
    t = np.arange(0, N, 32) / SR
    rows = np.vstack(drags).T[..., None]
    since = t - rows[0]
    shape = np.clip(since / rise_s, 0, 1) * undb(-120 * np.maximum(since - rows[1], 0) / t60_s)
    return np.interp(np.arange(N) / SR, t, np.sum(undb(2 * rows[column]) * shape, axis=0))


def walk_db():
    """Rattle levels of board and shells: patter, strides, and the shaking after clicks and the fall."""
    # patter under the strides, rising and sinking into lulls, one list per walk:
    # (time [s], board level [dB], shell level [dB])
    patter = [
        [(0, -34, -48), (1.7, -35.5, -58), (1.99, -47, -72), (2.03, -32, -41), (2.26, -37, -55),
         (2.96, -31, -47.5)],
        [(4.52, -51, -63), (4.56, -32, -55.5), (4.8, -32.5, -46.5), (6.3, -31, -52.5), (7.9, -34, -50),
         (8.25, -47, -61), (8.4, -32, -54), (8.75, -48, -80), (8.84, -39, -50), (9.2, -31, -56),
         (9.49, -51, -82)],
    ]
    # loose parts shake on: (offset from the blow [dB], rise [s], t60 [s])
    click_shake = (-12.5, 0.012, 0.14)
    fall_board_shake, fall_shell_shake = (-17.5, 0.0034, 1.0), (-17, 0.0035, 0.52)
    s, board_db, _, shell_db = np.transpose(FALL_BLOWS[:1])
    board = undb(2 * curve(patter, column=1)) + strain(column=2)
    board = board + shake(s, board_db, *fall_board_shake)
    shell = undb(2 * curve(patter, column=2)) + strain(column=3)
    shell = shell + shake(s, shell_db, *fall_shell_shake)
    shell = shell + shake(*np.vstack(CLICK_EVENTS).T[:2], *click_shake)
    return 10 * np.log10(board), 10 * np.log10(shell)


def rattle(level_db, modes, per_s, scatter_db, colour_db, *contact):
    """Dense chance knocks, some stronger among many weak, follow the walk; each rings only some of the modes."""
    at = np.flatnonzero(rng.random(N) < per_s / SR)[:, None]
    colour = np.minimum(rng.standard_normal((len(at), len(modes))), 2)
    strength_db = scatter_db * np.minimum(rng.exponential(size=at.shape), 3)
    db = strength_db + np.where(colour > 0, colour_db * colour, -np.inf)
    return unit(ring(at / SR, db, modes, *contact)) * undb(level_db)


def quiver():
    """Board and shell quiver after the fall: noise in broad resonances, fading in jolts."""
    # broad resonances: (frequency [Hz], level [dB])
    resonances = [(282, 7.5), (560, -3), (900, -2.5), (1250, -4), (2000, -25), (3600, -37), (5200, -6.5),
                  (7600, -5.5), (9300, -19), (12500, -25)]
    tail = (-23, 0.0032, 0.7)  # offset from the blow [dB], rise [s], t60 [s]
    jolts = undb(3.0 * slow_noise(int(.012 * SR)))
    noise = rng.standard_normal(N) + .5 * rng.standard_normal((2, N))
    body = unit(sum(undb(db - 10 * np.log10(hz)) * band(noise, hz, 0.28 * hz) for hz, db in resonances))
    first_s, first_db = FALL_BLOWS[0][:2]
    return body * jolts * np.sqrt(shake([first_s], np.array([first_db]), *tail))


def crack(s, parts_db, pan_db):
    """The first snap of a contact: a burst of noise in the broad band of each part."""
    # body, legs, thin parts, top: (centre [Hz], width [Hz])
    bands = [(2130, 770), (4700, 1700), (7400, 720), (11500, 8400)]
    out, fade = 0, np.exp(-1 / (0.0021 * SR))  # fades over 2.1 ms
    for (hz, width), db in zip(bands, parts_db.T):
        hits = [np.bincount((s * SR).astype(int), undb(db + side * pan_db / 2), N) for side in (1, -1)]
        noise = rng.standard_normal(N) + 0.59 * rng.standard_normal((2, N))
        burst = signal.lfilter([1], [1, -fade], hits) * noise
        # narrow bands are lifted to make up for the noise they lose
        out = out + np.sqrt(SR / width / 4) * band(band(burst, hz, width), hz, width)
    return out


def clicks():
    """Each click snaps, rings body, legs, thin parts and top in its own mix, then chatters twice more weakly."""
    # balance of the clicks, rightward in the first walk, back leftward in the second:
    # (time [s], left minus right [dB])
    drift = [(0, 3), (2.9, -7), (4.6, -1.5), (8.8, 2)]
    s, level_db, *parts_db = np.vstack(CLICK_EVENTS).T[..., None]
    parts_db = level_db + np.hstack(parts_db)
    db = parts_db[:, shell_parts()]
    # each spot favours a few modes
    db = db + 3.6 * np.clip(rng.standard_normal(db.shape), -2, 1.5) - 0.26
    pan_db = np.interp(s, *np.transpose(drift)) + 2.7 * rng.standard_normal(s.shape)
    main = ring(s, db - 8.0, SHELL_MODES, 0.00054, .0001, 0.031, 4.8, pan_db)
    chatter = sum(ring(s, db - 8.5, SHELL_MODES, .006, 0.0001, 0.055, 2.0, pan_db) for _ in range(2))
    snap = crack(s[:, 0], parts_db - 10, pan_db[:, 0])
    return main + chatter + snap


def thump(s, level_db, centre, bright_db, rest_db=19):
    """A blow on the board: its spot favours the low mode near one pitch, which swells; bright modes rise faster."""
    low = [mode for mode in BOARD_MODES if mode[0] < 580]
    bright = BOARD_MODES[len(low):]
    # low modes weaken with distance from the centre, by rest_db at most
    low_db = level_db - np.minimum(45 * np.abs(np.log2(np.array(low)[:, 0] / centre)), rest_db)
    bright_mode_db = level_db + bright_db + np.zeros(len(bright)) + 0.49
    body = ring(s, low_db, low, 0.00208, 0.0033, 0.027, 1.25, 0., centre)
    return body + ring(s, bright_mode_db, bright, 0.000952, 0.0016, 0.071, 1.7)


def fall():
    """The whole shell meets the board: a hard blow and bounces, with chatter in all shell modes."""
    s, board_db, bright_db, shell_db = np.transpose(FALL_BLOWS)[..., None]
    parts_db = np.array((0.28, 1.3, 1.5, 2.2))  # body, legs, thin parts, top
    db = shell_db + parts_db[shell_parts()]
    shell = ring(s, db - 6.5, SHELL_MODES, 0.0014, .0001, 0.055, 4.5, -1.6)
    chatter = ring(s, db - 16.5, SHELL_MODES, .008, 0.00026, 0.0955, 2.4, -1.8)
    return thump(s, board_db - 3.5, 277.6, bright_db - 1.5, 11.6) + shell + chatter


def steps():
    """Light feet strike the board, each ringing it around its own pitch."""
    # one list per walk: (time [s], level [dB], centre of the ring [Hz], bright part [dB])
    footfalls = [
        [(0.02, -24, 354, -18), (0.143, -35.5, 336, 3), (0.208, -30.5, 326, 0.5), (0.262, -39, 348, -2),
         (0.308, -21.5, 292, -11), (0.413, -19.5, 384, -8.5), (0.485, -32.5, 335, -27), (0.543, -24, 387, -7.5),
         (0.598, -16.5, 320, -6), (0.64, -17.5, 357, -16), (0.694, -23, 283, -17), (0.704, -28.5, 388, 2.5),
         (0.87, -18, 289, -11), (0.933, -15, 304, -14), (0.963, -16.5, 302, -12), (1.082, -20, 335, -8),
         (1.151, -21.5, 282, -15), (1.178, -19, 311, -18), (1.284, -14.5, 377.6, -11),
         (1.337, -16.5, 284, -11.5), (1.413, -18, 301, -25), (1.462, -21.5, 328, -12), (1.488, -26.5, 335, 1),
         (1.669, -22, 337, -13), (1.712, -15, 344, -23), (1.797, -27, 338, 4), (1.909, -24, 266, -23),
         (2.024, -33, 276, -1), (2.057, -24, 281, -18), (2.172, -29, 299, -4), (2.265, -28, 257, -13),
         (2.327, -28, 262, -4.5), (2.381, -33, 275, -4), (2.417, -18.5, 279, -11.5), (2.48, -33, 277.5, 5.5),
         (2.543, -35, 264, 3), (2.612, -33.5, 400, 6.5), (2.653, -17.5, 258, -19), (2.76, -30, 311, -8),
         (2.775, -18.5, 281, -6.5), (2.843, -33, 335, -1), (2.88, -21.5, 275, -10)],
        [(4.558, -26, 270.4, -14), (4.649, -25.5, 429.7, -12), (4.724, -35, 437, -17), (4.733, -19, 470, -27),
         (4.785, -34, 450, -3), (4.846, -19.5, 281.5, -7.5), (5.063, -19, 424, -11), (5.103, -29, 377, -23),
         (5.183, -20, 285, -15), (5.188, -22.5, 406, -9), (5.235, -30, 407, -17), (5.319, -25, 359, -9),
         (5.373, -15.5, 299, -33), (5.494, -30, 275, -26), (5.529, -30, 410, 1), (5.607, -12.5, 456, -14.5),
         (5.622, -23, 460, 1), (5.645, -20.5, 392, -5.5), (5.745, -20.5, 432, -18), (5.753, -28.5, 430, 0),
         (5.835, -17.5, 334, -21), (5.909, -42, 293, -16), (5.948, -12.5, 342, -9.5), (6.067, -24.5, 349, -9),
         (6.129, -18, 427, -9.5), (6.157, -17.5, 399, -10), (6.227, -23, 340, -9.5),
         (6.307, -17.5, 391.5, -5.5), (6.467, -27.5, 402, -11), (6.529, -13, 385, -15.5),
         (6.659, -18.5, 397, -23), (6.731, -24, 336, -8), (6.765, -19.5, 351.4, -19),
         (6.837, -12.5, 414, -18.5), (6.898, -19, 330, -30), (7.012, -25, 318, -1), (7.049, -24, 418, -27),
         (7.106, -12.5, 342, -26), (7.213, -18, 335, -32), (7.283, -33, 342, -2), (7.353, -19.5, 275, -11),
         (7.517, -29, 275, -28), (7.553, -15, 290, -22), (7.572, -8, 289, -17), (7.655, -15.5, 282, -19),
         (7.852, -26, 275, -13), (7.903, -21.5, 358, -3), (8.008, -19.5, 276, -25), (8.124, -25, 428, -29),
         (8.269, -29, 308, -14), (8.296, -29.5, 275, -5.5), (8.373, -19, 283, -40), (8.478, -19, 324, -28),
         (8.564, -40, 356, 5), (8.59, -26, 276, -21), (8.622, -25, 312, 0.5), (8.691, -27, 367, 3),
         (8.75, -21, 289, -7)],
    ]
    return thump(*np.vstack(footfalls).T[..., None])


def scene():
    """Toys on the board with their room tail, motors and whine, then fingers and room noise."""
    board_db, shell_db = walk_db()
    toys = steps() + clicks() + fall() + quiver() + whirr(shell_db - 9.0)
    toys = toys + rattle(board_db - 5.5, BOARD_MODES, 150, 3.26, 4.7, .003, 0.0027, 0.0637, 3.17)
    toys = toys + rattle(shell_db - 8.0, SHELL_MODES, 600, 5.2, 3.8, .0012, .0001, 0.0506, 2.0)
    toys = toys + undb(-8.5) * room(toys)
    # the sound of the first walk is cut off at once, tail and all; a second walk follows
    heard = np.interp(np.arange(N) / SR, [2.955, 2.968, 4.5, 4.52], [1, 0, 0, 1])
    return (toys + hum() + whine()) * heard + ticks() + air()


def record(dry):
    """Left has a little more bass and lags slightly, right more treble; peaks clip and the top is cut."""
    left_lag_s, clip_level, top_hz = 1e-5, .96, 16000
    bright = signal.lfilter(*signal.butter(1, 1200, "high", fs=SR), dry)
    tilted = undb([[.2], [-.2]]) * dry + np.array([[-.15], [.15]]) * bright
    lag = np.exp(-2j * np.pi * np.fft.rfftfreq(N, 1 / SR) * left_lag_s)
    tilted[0] = irfft(rfft(tilted[0]) * lag, N)
    low_pass = signal.ellip(10, .2, 90, top_hz, fs=SR, output="sos")
    return signal.sosfilt(low_pass, np.clip(tilted, -clip_level, clip_level))


dry = scene()
out = record(dry)
to_wav(out)
```